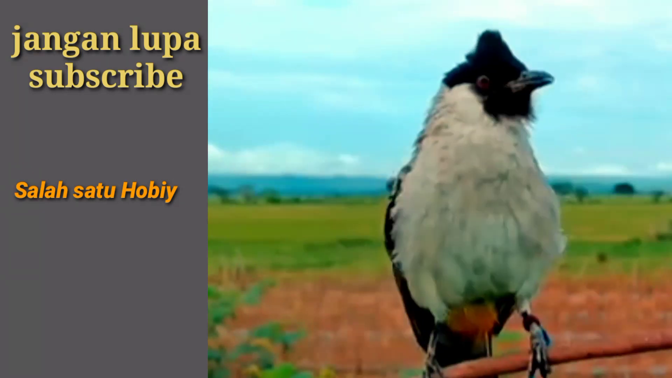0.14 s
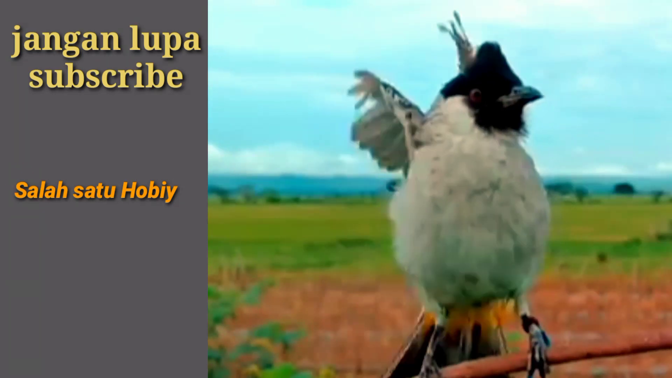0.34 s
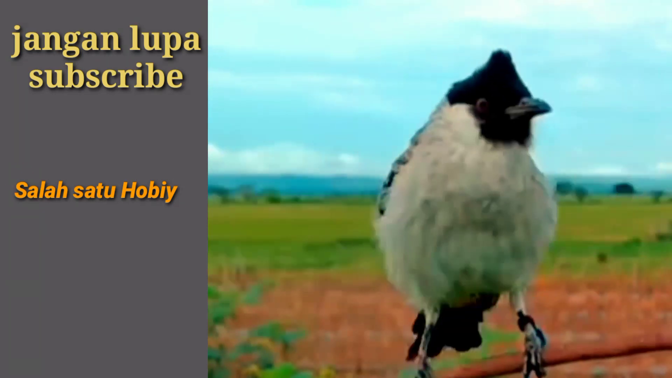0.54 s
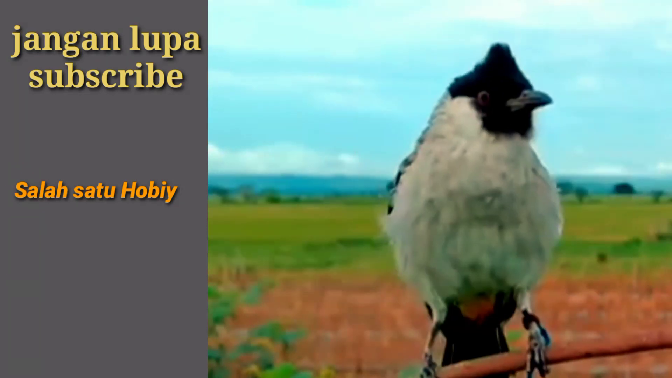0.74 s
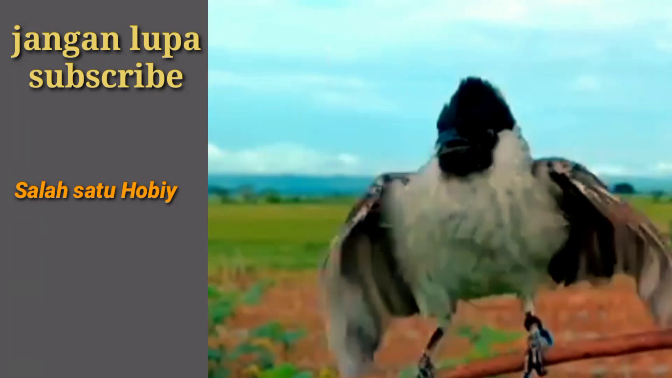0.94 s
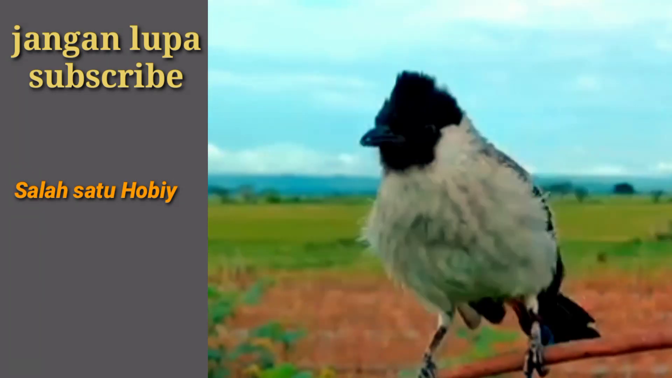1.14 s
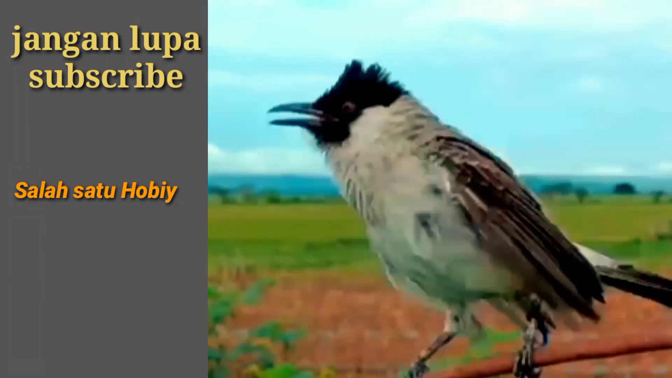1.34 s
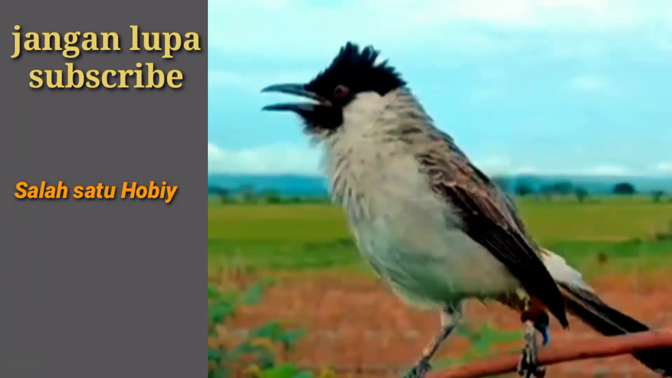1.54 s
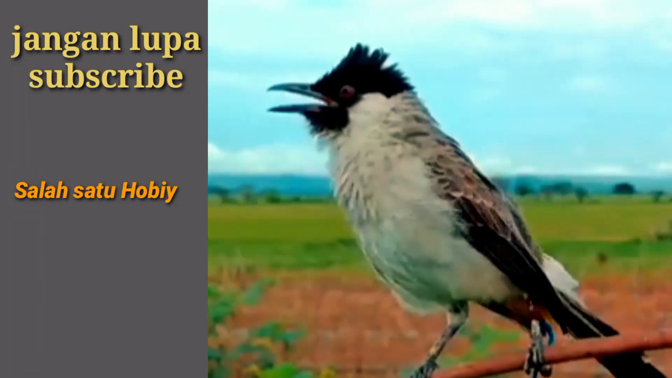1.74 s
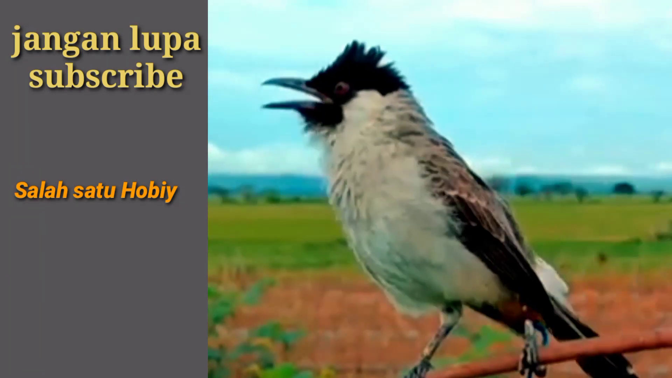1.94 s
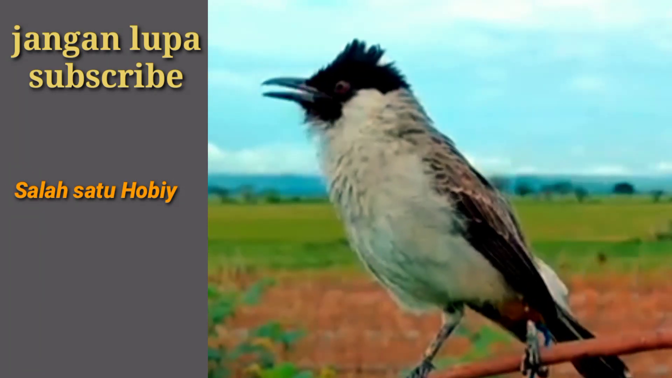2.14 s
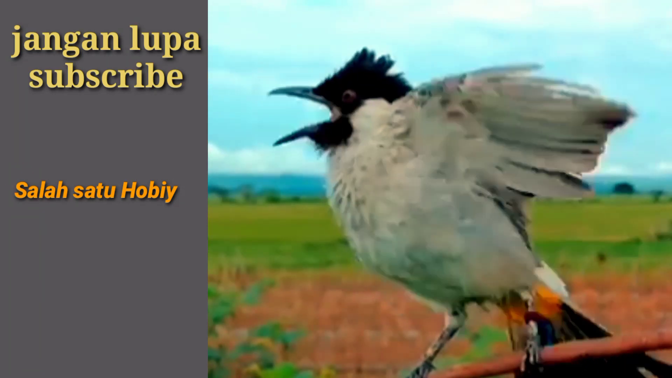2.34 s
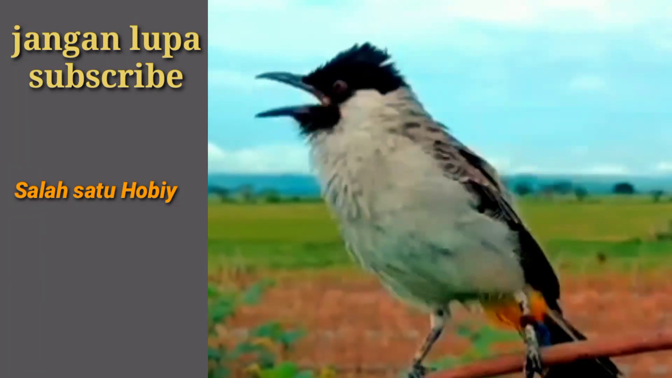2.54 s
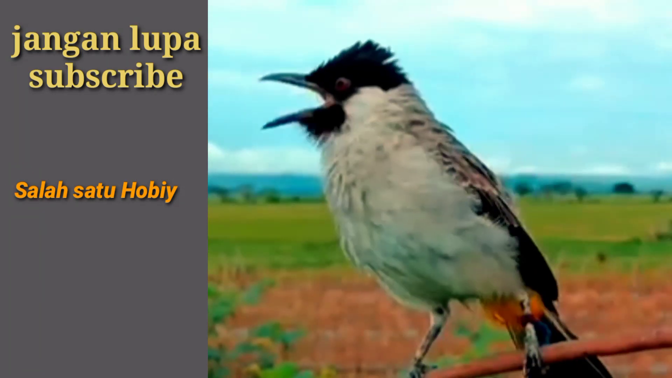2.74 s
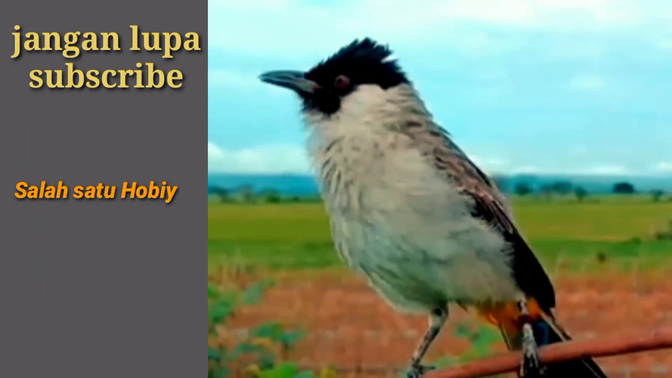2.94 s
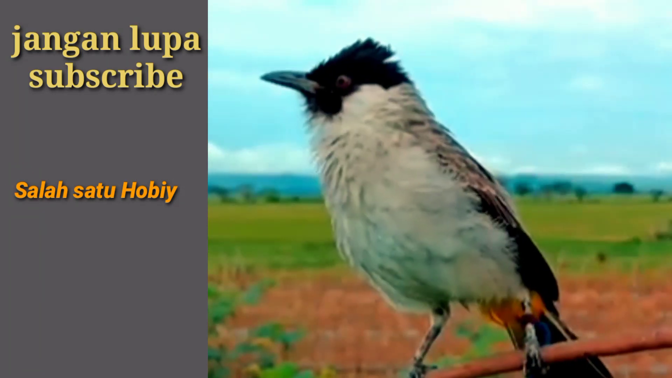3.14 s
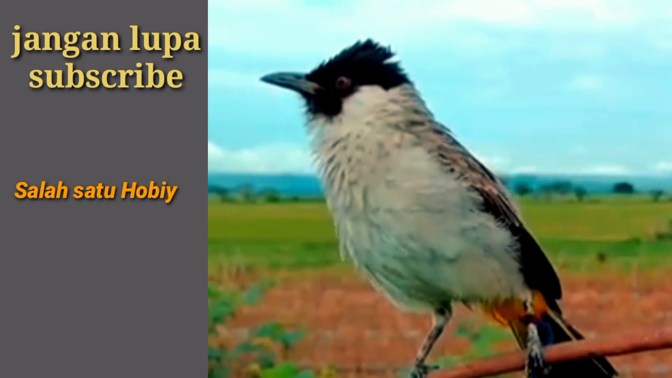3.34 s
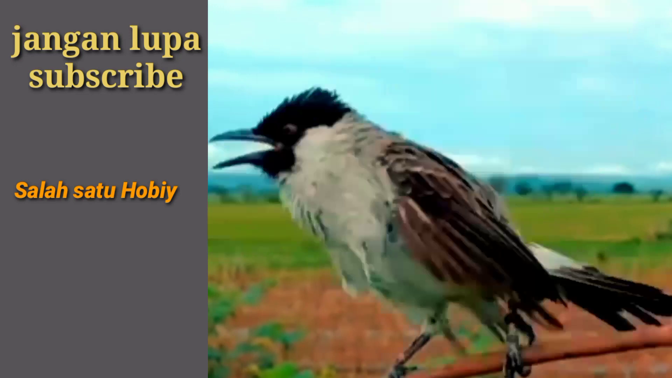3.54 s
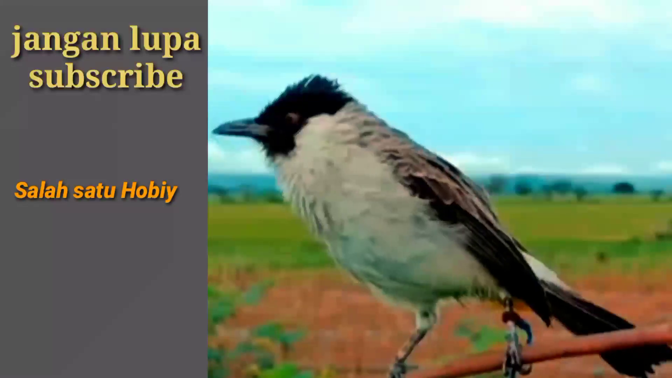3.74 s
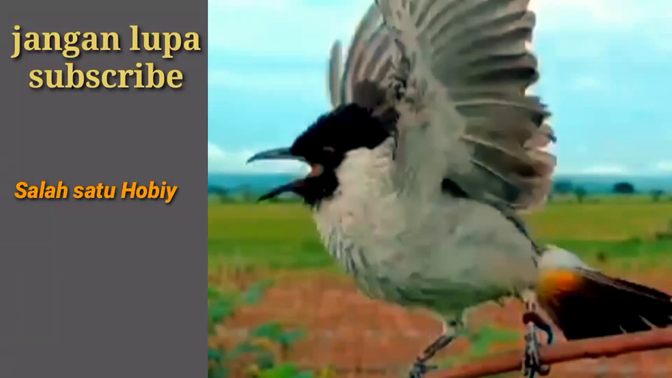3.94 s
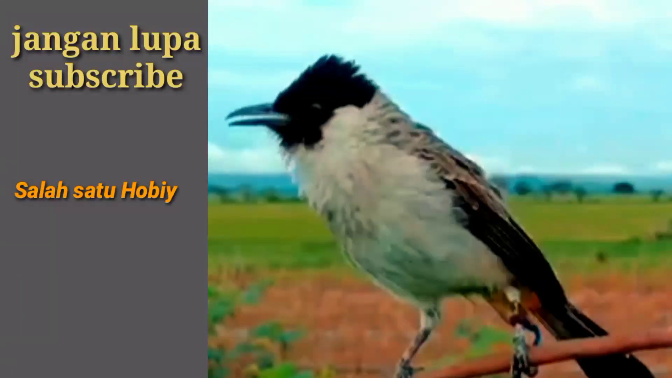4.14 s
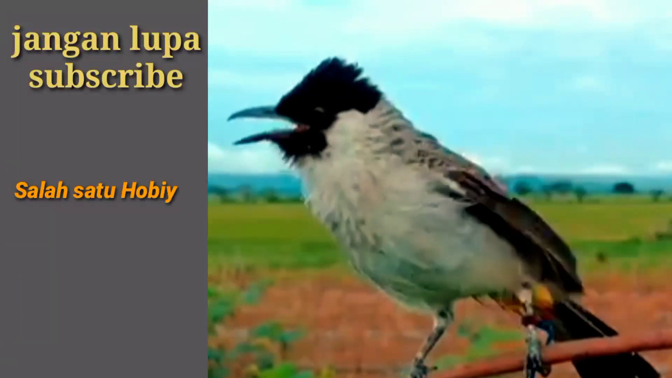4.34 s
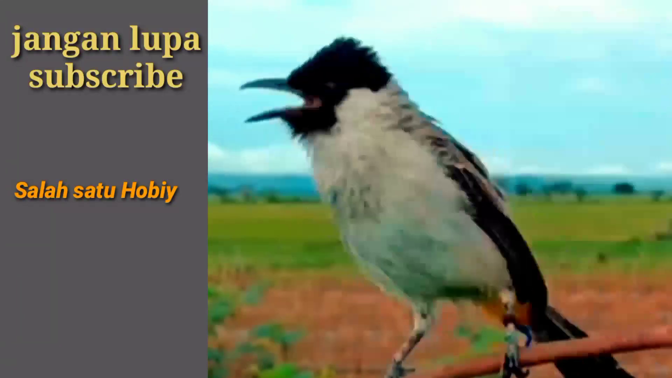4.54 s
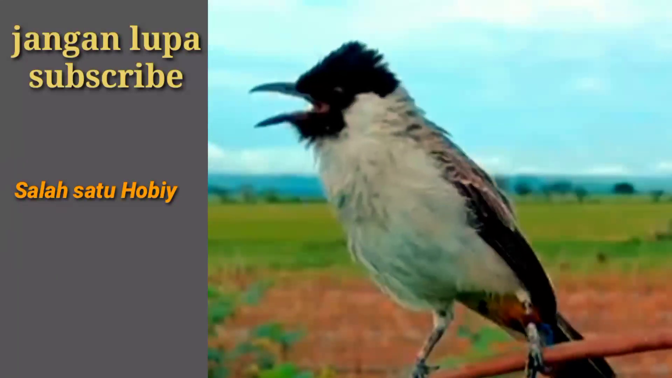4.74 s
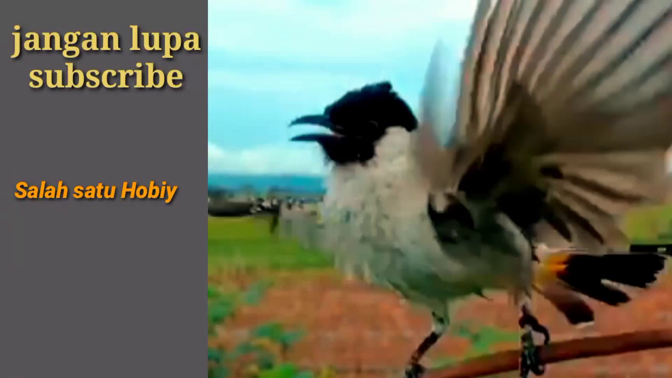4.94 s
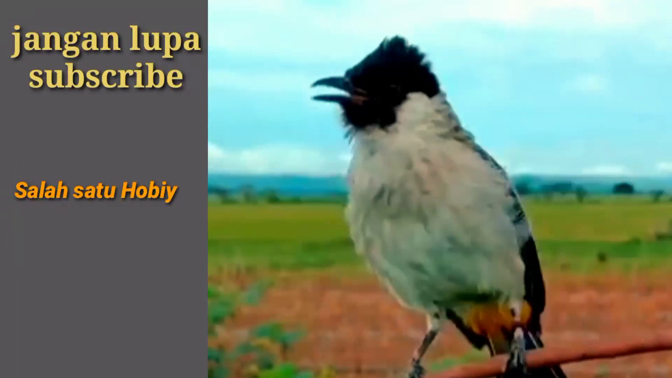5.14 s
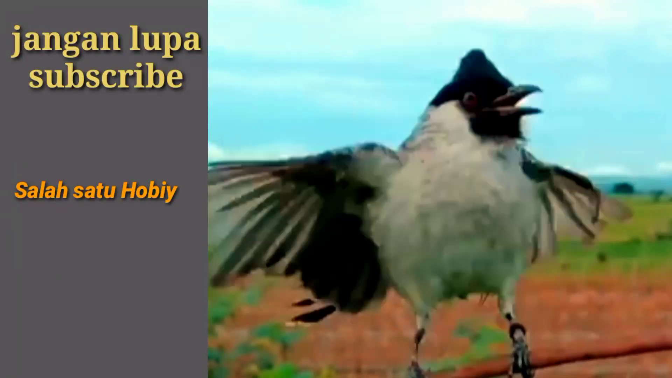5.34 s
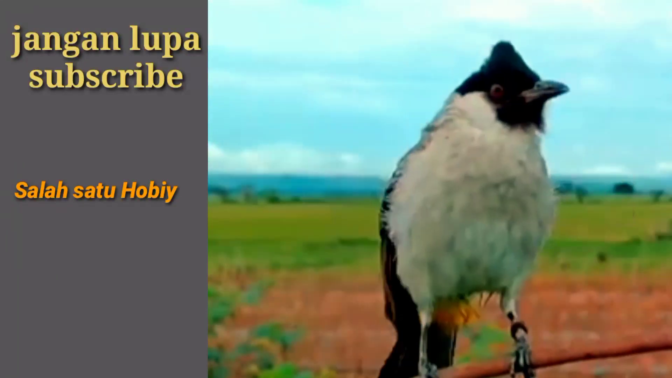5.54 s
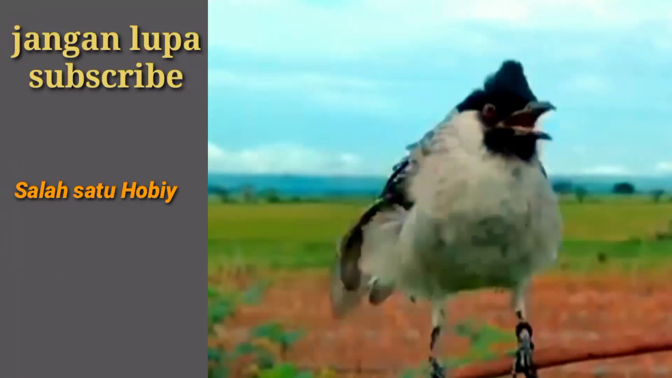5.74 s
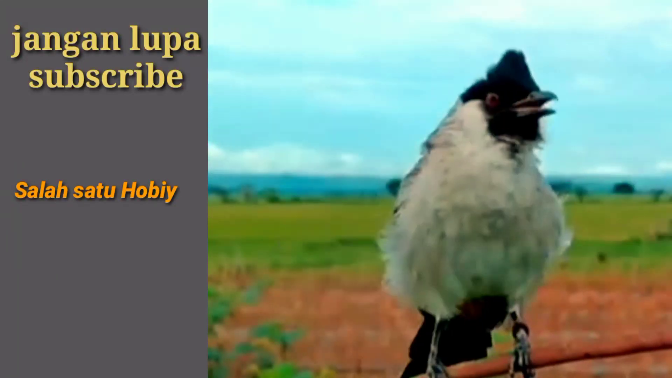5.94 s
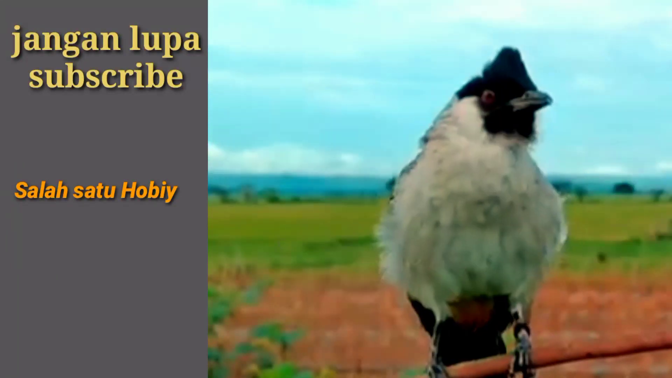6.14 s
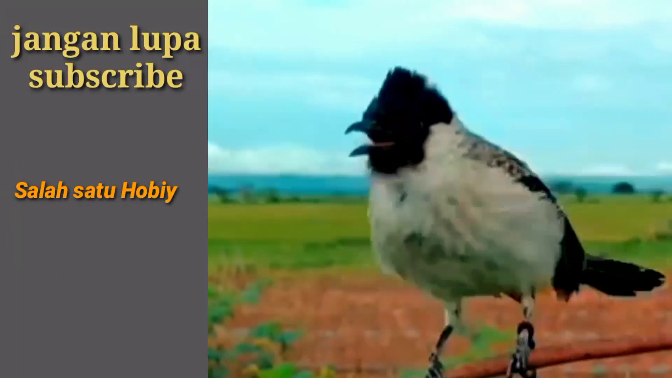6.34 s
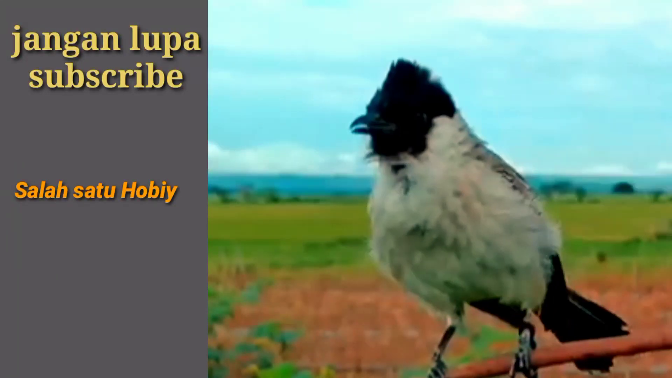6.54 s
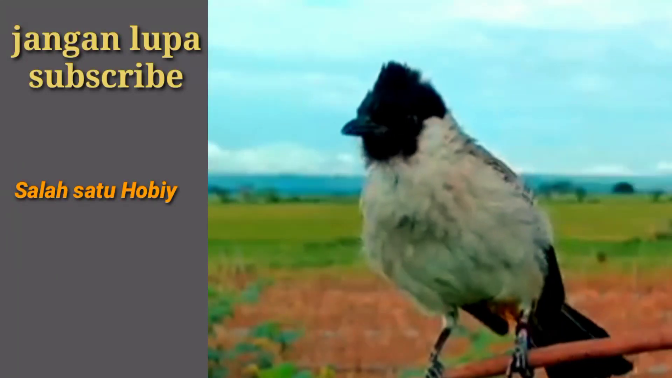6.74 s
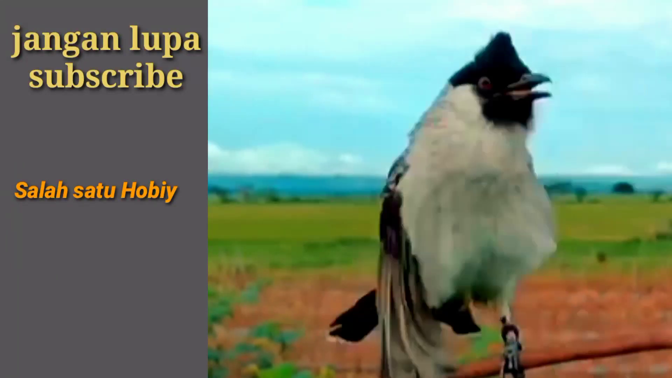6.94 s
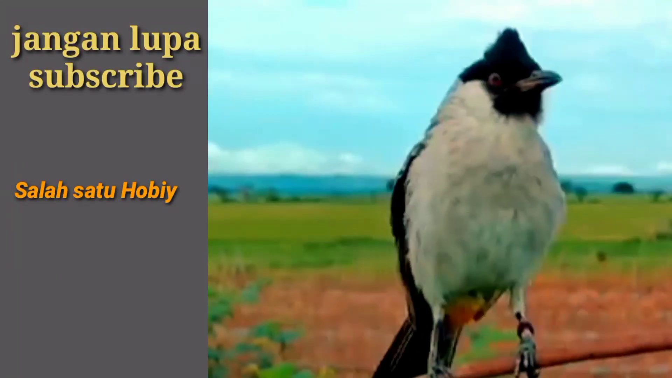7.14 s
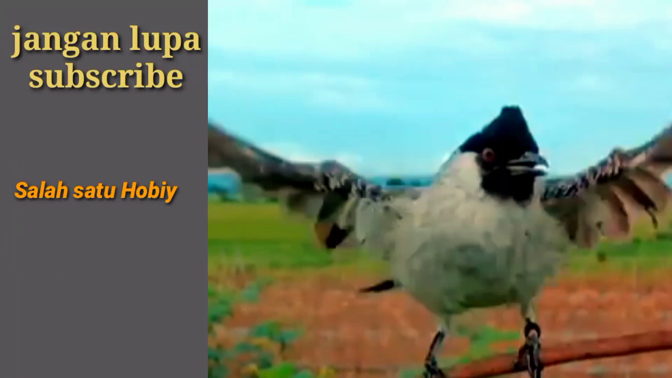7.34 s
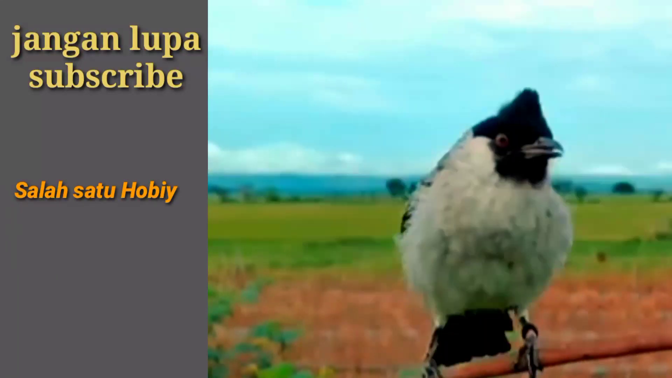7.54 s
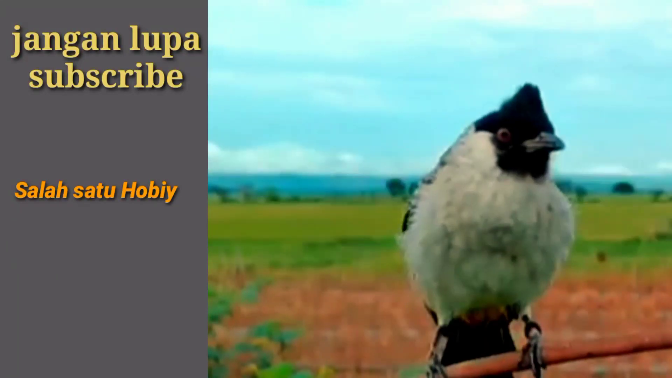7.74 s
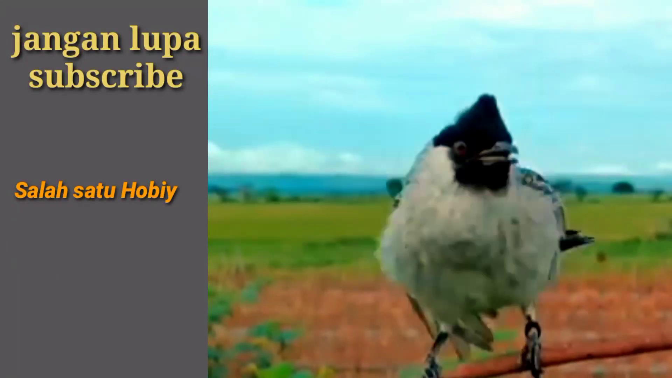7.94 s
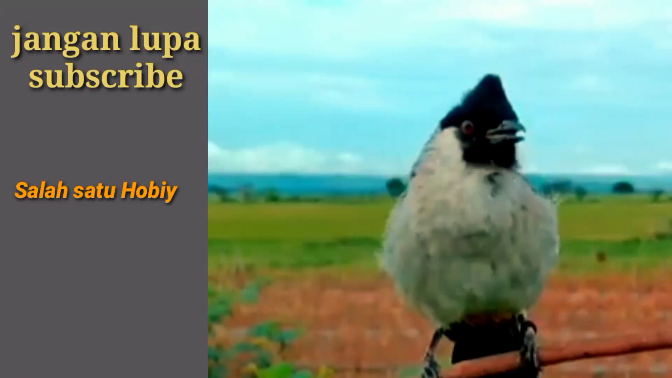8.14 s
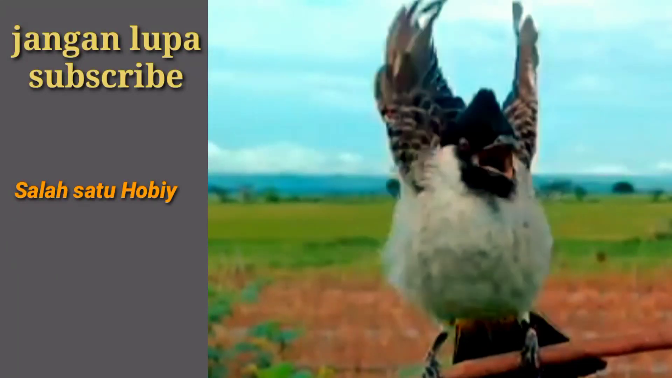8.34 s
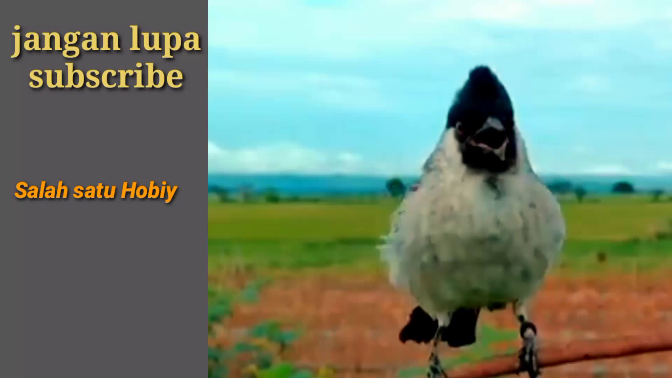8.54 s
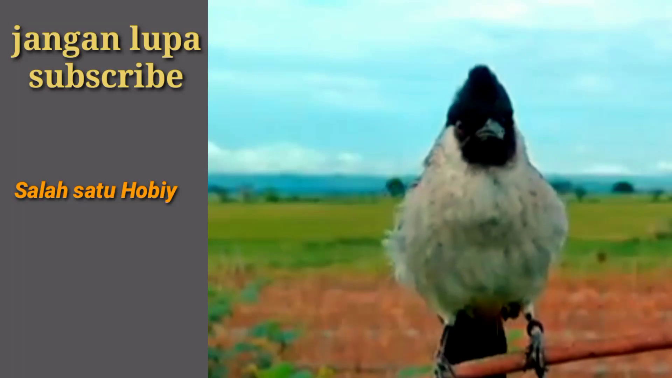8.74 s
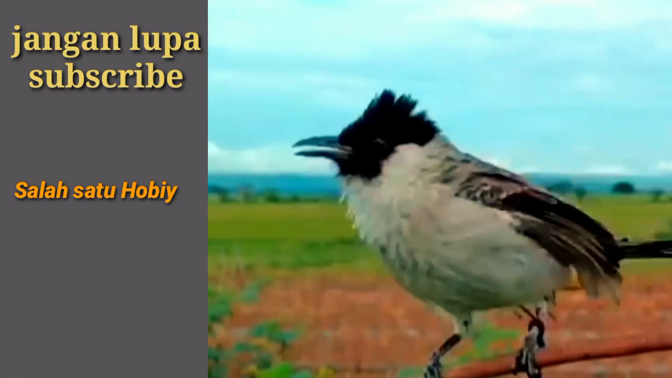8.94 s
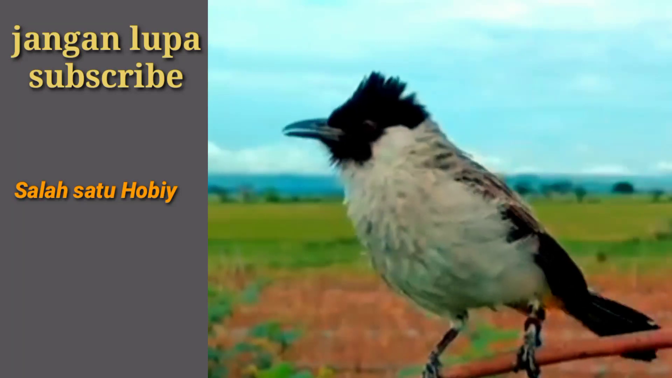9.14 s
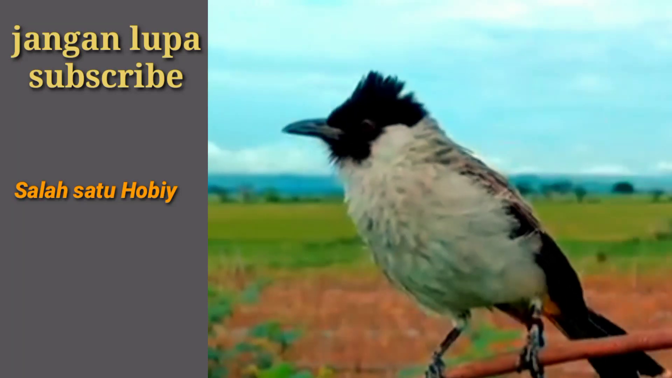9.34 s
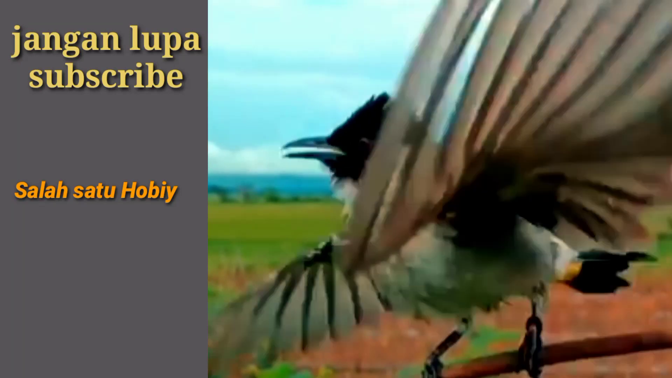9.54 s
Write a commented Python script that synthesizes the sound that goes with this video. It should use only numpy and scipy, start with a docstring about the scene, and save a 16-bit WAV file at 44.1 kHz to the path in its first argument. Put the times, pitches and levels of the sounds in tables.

```python
"""Bulbul singing close to the microphone

A bulbul strings gliding whistles (few partials), thin squeaks and raspy trilled chirps (harmonic stacks
through a throat response) into phrases; its loudest notes overload the input, its wings puff air at it.
Behind it: insect trills of gated tones, faint gliding far birds, shaped-noise hiss and a low air rumble."""
import sys
import numpy as np
from scipy import signal
from scipy.fft import rfft, irfft
from scipy.io import wavfile
from scipy.ndimage import uniform_filter1d, map_coordinates

SR = 44100
rng = np.random.default_rng(int(sys.argv[2]) if len(sys.argv) > 2 else 0)


def file_out(sig):
    """Save sig as 16-bit WAV at sys.argv[1]."""
    # one column per channel
    cols = np.atleast_2d(sig).T
    # limit, then scale
    lim = np.clip(cols, -1, 1)
    pcm = np.round(lim * 32767).astype(np.int16)
    wavfile.write(sys.argv[1], SR, pcm)


N = 423360
OVER = 4  # oversampling of the bird and the overload
FINE = OVER * SR  # samples/s

# Stock of notes, before stretch and pitch factor:
# (attack [s], release [s], relative level [dB], pitch curve of (time [s], pitch [Hz]))
RISE = (0.04, 0.0083, 3.8, [(0, 1600), (.0085, 2440), (.022, 2430), (.0334, 2799), (.0474, 2850),
        (.0574, 2900)])
PIP = (0.019, .012, 3.5, [(0, 1374), (.0045, 1770), (.008, 3133), (.01, 2861), (.0235, 2825), (.0355, 2968),
       (.0453, 2964), (.05, 2797), (.0564, 2948)])
DIP = (.007, 0.042, 2, [(0, 2082), (.0045, 2747), (.0085, 2660), (.014, 2517), (.0215, 1734), (.036, 1835),
       (.048, 2170)])
TOOT = (0.021, .013, 3.5, [(0, 2396), (.008, 2624), (.017, 2538), (.0395, 2767), (.045, 2695),
        (.0555, 2834)])
YIP = (0.00065, 0.02, 6, [(0, 3760), (.004, 2630), (.008, 3270), (.015, 3280)])
PEEP = (0.048, 0.014, -2, [(0, 1880), (.011, 1700), (.018, 2210), (.037, 2050)])
SPIKE = (.005, 0.018, 2.3, [(0, 1500), (.013, 1384), (.018, 1700), (.0235, 2600), (.026, 2000),
         (.029, 3000), (.035, 3020), (.043, 2406), (.072, 2296), (.082, 1900)])
WAVE = (0.0055, 0.012, 2.9, [(0, 1800), (.004, 1700), (.008, 2430), (.019, 2610), (.027, 1900), (.05, 1716),
        (.063, 1960), (.08, 2380), (.096, 2450)])
SQUEAK = (0.025, 0.013, -3.5, [(0, 1573), (.011, 1686), (.016, 1892), (.0195, 2650), (.03, 2080),
          (.046, 1880)])
LOOP = (.005, .014, 2.5, [(0, 2960), (.006, 4254), (.013, 4830), (.02, 4590), (.031, 2842), (.037, 2670),
        (.041, 3980), (.048, 3690), (.055, 3233), (.069, 3020)])
SLUR = (0.043, 0.028, 3.5, [(0, 2536), (.004, 3090), (.02, 2920), (.045, 3310), (.055, 3052), (.064, 2705),
        (.07, 2150), (.083, 1300)])
SLIDE = (0.0082, 0.016, 2.86, [(0, 1554), (.0056, 3140), (.0146, 3057), (.03, 2643), (.039, 2592),
         (.048, 2666), (.062, 2634), (.074, 2000)])
ROLL = (0.0086, 0.012, 2.9, [(0, 3290), (.006, 3193), (.009, 3696), (.02, 2768), (.043, 2300), (.057, 2360),
        (.07, 2817), (.089, 2510), (.098, 1310)])
HOOK = (.003, 0.014, 0.73, [(0, 1342), (.02, 1507), (.027, 2468), (.0375, 2758), (.0515, 2410),
        (.055, 1794), (.06, 2090), (.072, 1910)])
BUBBLE = (0.011, 0.013, 3.1, [(0, 1766), (.004, 1833), (.009, 1380), (.021, 1596), (.028, 2006),
          (.031, 2960), (.0345, 3400), (.039, 2204), (.045, 2008), (.058, 2258), (.066, 1650), (.072, 1620),
          (.091, 2180)])
FLICK = (.011, 0.012, 2.86, [(0, 2106), (.008, 2436), (.018, 2596), (.021, 2958), (.039, 2570),
         (.0455, 2313), (.047, 2026), (.063, 2310)])
# Set phrases of notes: (note, delay before stretch [s])
OPENING = [(YIP, 0), (PEEP, .074), (SPIKE, .12), (WAVE, .198)]
LONE_PIP = [(PIP, 0)]
WARBLE = [(SQUEAK, 0), (LOOP, .049), (SLUR, .161)]
ROLLING = [(SLIDE, 0), (ROLL, .0685), (HOOK, .165)]
BUBBLING = [(BUBBLE, 0), (FLICK, 0.09)]

LOW_INSECT_HZ, HIGH_INSECT_HZ = 4380, 4600


def amp(db):
    """Gain of a level in dB."""
    return 10 ** (np.asarray(db) / 20)


def evened(x):
    """Scale to rms 1."""
    return x / np.sqrt(np.mean(x ** 2) + 1e-20)


def read(points, hz):
    """Interpolate a curve over frequency on a log axis."""
    f, value = np.transpose(points)
    return np.interp(np.log(hz + 1), np.log(f), value)


def level(points):
    """Per-sample gain from a curve of dB over time."""
    s, db = np.transpose(points)
    return amp(np.interp(np.arange(N) / SR, s, db))


def add(mix, at, sound):
    """Mix a sound in at a sample index, cut at the end."""
    part = mix[max(round(at), 0):][:len(sound)]
    part += sound[:len(part)]


def noise(points, size):
    """Noise of rms 1 with the given spectrum."""
    spectrum = rfft(rng.standard_normal(size))
    gain = amp(read(points, np.fft.rfftfreq(size, 1 / SR)))
    return evened(irfft(spectrum * gain, size))


def wander(t, hz):
    """Smooth random curve of about unit size, through hz random points a second."""
    return map_coordinates(rng.standard_normal(2048), [(t - t[0]) * hz % 2047], order=3)


def edges(t, fade_s):
    """Soft start and stop."""
    return np.sin(np.pi / 2 * np.clip(np.minimum(t, t[-1] - t) / fade_s, 0, 1)) ** 2


def hiss():
    """High hiss: noise with several spectral peaks, dipping briefly in level."""
    # Spectrum: (frequency [Hz], relative gain [dB])
    hiss_spectrum = [(500, -24), (2000, -25), (3000, -31.5), (3650, -19), (4100, -19), (5000, -22.5),
                     (5650, -9), (6120, -1.5), (6550, -10), (7050, -16), (7550, -9), (8300, -22.5),
                     (9650, -15), (11300, -24.5), (15000, -46.5)]
    # Overall strength: (time [s], level [dB])
    hiss_course = [(0, -50), (3.79, -49), (3.83, -61.5), (4.2, -51), (9.6, -49)]
    return noise(hiss_spectrum, N) * level(hiss_course)


def breeze(lumps_db=4):
    """Low rumble of moving air, lumpy in level."""
    # Spectrum: (frequency [Hz], relative gain [dB])
    rumble_spectrum = [(15, 0), (45, 6.5), (90, 2.5), (150, -7), (210, -15.5), (270, -20.5), (340, -34),
                       (600, -56), (2000, -63.5), (5000, -86.5)]
    # Slow strength: (time [s], relative level [dB])
    breeze_course = [(0, -38.5), (.26, -50), (.35, -37.5), (.92, -29.5), (1.34, -37), (1.8, -47.5),
                     (3.6, -52.5), (4.5, -39.5), (5.9, -46.5), (7.4, -49.5), (8.6, -52), (9.1, -42.5),
                     (9.6, -60)]
    lumps = amp(3.0 + lumps_db * wander(np.arange(N) / SR, 22))
    return noise(rumble_spectrum, N) * level(breeze_course) * lumps


def far_birds():
    """Short wavering glides from farther off."""
    # Calls: (start [s], length [s], start pitch [Hz], end pitch [Hz], relative level [dB])
    far_calls = [(1.251, 0.06, 3410, 2560, -32.5), (1.358, 0.09, 2700, 2520, -35.5),
                 (4.029, .07, 3900, 4255, -55), (7.431, .057, 3340, 3760, -49),
                 (7.718, 0.074, 3370, 2624, -35.5), (7.855, 0.086, 2690, 2376, -38),
                 (7.997, 0.044, 3340, 3620, -38.5), (8.18, 0.057, 2410, 3200, -32.5),
                 (8.491, .035, 3450, 3720, -35), (8.86, 0.049, 3510, 3590, -30.5),
                 (8.956, 0.045, 3150, 2635, -34.5), (9.503, .08, 3510, 3786, -49)]
    out = np.zeros(N)
    for s, length_s, from_hz, to_hz, db in far_calls:
        t = np.arange(0, length_s, 1 / SR)
        hz = np.linspace(from_hz, to_hz, len(t)) * (1 + 0.035 * wander(t, 250))
        strength = amp(db + 1.5 + 2.7 * wander(t, 120)) * edges(t, 0.0052)
        add(out, s * SR, strength * np.sin(2 * np.pi * np.cumsum(hz) / SR))
    return out


def insects(chirps_hz=20, sag=.04):
    """Each cricket-like chirp is two wing strokes and a rest; each stroke sags in pitch."""
    # Trills: (start [s], end [s], mid-stroke pitch [Hz], mean level [dB])
    insect_trills = [(0.115, .456, LOW_INSECT_HZ, -45), (0.991, 2.292, LOW_INSECT_HZ, -43.5),
                     (2.597, 3.0, HIGH_INSECT_HZ, -45.5), (3.19, 3.754, LOW_INSECT_HZ, -42),
                     (5.419, 6.203, LOW_INSECT_HZ, -51), (6.765, 7.457, LOW_INSECT_HZ, -43.5),
                     (6.898, 7.449, HIGH_INSECT_HZ, -56), (7.802, 8.046, HIGH_INSECT_HZ, -53),
                     (8.737, 9.52, LOW_INSECT_HZ, -44.5)]
    out = np.zeros(N)
    for start, end, hz, db in insect_trills:
        t = np.arange(0, end - start, 1 / SR)
        stroke = (t * chirps_hz % 1) * 3
        gate = np.sin(np.pi * (stroke % 1)) * (stroke < 2)
        drift = 1 - sag * (stroke % 1 - .5) + 0.0016 * wander(t, 190)
        turns = np.cumsum(hz * drift) / SR
        add(out, start * SR, amp(db + wander(t, 26)) * gate * np.sin(2 * np.pi * turns))
    return out


def wing_puffs():
    """Wings throw puffs of air at the microphone: low noise under Gaussian swells."""
    # Puffs: (time of peak [s], Gaussian width [s], level [dB])
    puff_times = [(1.577, 0.016, -16.5), (2.696, 0.027, -29), (3.261, 0.064, -33.5), (3.803, 0.016, -4.5),
                  (3.838, 0.068, -29.5), (4.273, 0.029, -16.5), (4.71, 0.025, -24), (5.239, 0.037, -26.5),
                  (6.51, .025, -24.5)]
    # Spectrum: (frequency [Hz], relative gain [dB])
    puff_spectrum = [(15, -11.5), (45, 9), (85, 2.5), (130, -10.5), (220, -24), (500, -34), (2000, -51.5),
                     (6000, -74)]
    out = np.zeros(N)
    t = np.arange(-SR // 3, SR // 3) / SR
    for s, width_s, db in puff_times:
        swell = np.exp(-(t / width_s) ** 2 / 2)
        puff = noise(puff_spectrum, len(t)) * swell
        # same energy as the swell
        puff = puff * np.linalg.norm(swell) / np.linalg.norm(puff)
        add(out, (s + t[0]) * SR, amp(db) * puff)
    return out


def wingbeat(s=3.803, hz=85, width_s=0.016, db=2):
    """One full downstroke shoves air at the microphone: a few slow pressure swings."""
    t = np.arange(-SR // 8, SR // 8) / SR
    out = np.zeros(N)
    swings = np.sin(2 * np.pi * hz * t + 0.69 * wander(t, 141.2))
    swings += amp(-14.0) * wander(t, 732)
    add(out, (s + t[0]) * SR, amp(db) * np.exp(-(t / width_s) ** 2 / 2) * swings)
    return out


def contour(note, stretch, pitch, db, shimmer_db=0.84):
    """Pitch and strength of a note that swells, holds and dies, with random wavering in both."""
    attack_db, release_db = -24, -36
    attack_s, release_s, note_db, curve = note
    s, hz = np.transpose(curve)
    t = np.arange(0, s.max() * stretch, 1 / FINE)
    hz = uniform_filter1d(np.interp(t, np.sort(s) * stretch, hz), size=400)
    hz = hz * pitch * (1 + .005 * wander(t, 140))
    swell_db = attack_db * np.maximum(1 - t / attack_s, 0) ** 2
    swell_db += release_db * np.maximum(1 - (t[-1] - t) / release_s, 0) ** 2
    strength = amp(db + note_db + swell_db + shimmer_db * wander(t, 400)) * edges(t, .0015)
    return t, hz, strength


def whistle(note, stretch, pitch, db, overtone_db=-24, fall_db=-13, half_db=-42, air_db=-47,
            husk_db=-32, glide_db=-29, slack_db=-11):
    """Nearly pure tone, loudest at the throat resonance; overtones come through when it dives below."""
    # Strength where the pitch meets the throat resonance: (pitch [Hz], gain [dB])
    carry = [(950, -19), (1300, -27.5), (1480, -15), (1750, -8), (2100, -4), (2500, -1), (3700, -1),
             (4400, -3.5), (4800, -11)]
    # Throat response to the overtones: (frequency [Hz], relative gain [dB])
    whistle_throat = [(800, -19), (1300, 10.5), (1800, 11.5), (2700, 5.5), (3500, -6), (4200, -16.5),
                      (4900, -26), (5600, -32), (9000, -27)]
    # Slackness of low notes: (pitch [Hz], share [0-1])
    slackness = [(1450, 1), (1800, 0)]
    t, hz, strength = contour(note, stretch, pitch, db)
    strength = strength * amp(read(carry, hz))
    phase = 2 * np.pi * np.cumsum(hz) / FINE
    tone = np.sin(phase)
    for k in range(2, 5):
        throat_db = read(whistle_throat, k * hz) - read(whistle_throat, np.minimum(hz, 3200))
        waver_db = 3 * wander(t, 200)
        purity_db = 4 * np.clip(strength, 0, 1.5)  # full-throated notes are the purest
        overtone_gain = amp(overtone_db + fall_db * (k - 4) + throat_db + waver_db - purity_db)
        tone += overtone_gain * np.sin(k * phase)
    # faint, wavering lines at half and one and a half times the pitch
    waver = amp(6 * np.tanh(wander(t, 110)))
    tone += amp(half_db) * waver * (np.sin(phase / 2) + np.sin(phase + phase / 2))
    # low notes go slack and buzz between the harmonics
    tone += amp(slack_db) * read(slackness, hz) * np.sin(1.5 * phase)
    # fast glides shake the tone
    glide = np.tanh(abs(np.gradient(np.log(hz))) * FINE / 40)
    tone += (amp(air_db) + amp(glide_db) * glide) * wander(t, 4100) * np.cos(phase)
    # barely voiced stretches turn husky
    weak = np.exp(-strength / 1.5) * edges(t, .003)
    rough_tone = wander(t, 1600) * np.sin(2 * np.pi * 2700 * t + 2 * wander(t, 750))
    return strength * tone + amp(husk_db) * weak * rough_tone


def squeak(note, stretch, pitch, db, grit_db=-23):
    """Thin note, heard mostly an octave above its pitch, with grit growing along it."""
    t, hz, strength = contour(note, stretch, pitch, db)
    phase = 2 * np.pi * np.cumsum(hz) / FINE
    tone = np.sin(2 * phase) + amp(-12.0) * np.sin(phase)
    tone += amp(-28) * np.sin(3 * phase) + amp(-17) * np.sin(phase + phase / 2)
    grit = wander(t, 4100) * np.sin(2 * np.pi * 3300 * t)
    grit *= amp(grit_db) * t / t[-1] * edges(t, .002)
    return strength * tone * (1 + 0.069 * wander(t, 1800)) + grit


def open_beak(t, hz, harsh, other_db=-11, harsh_db=11, rasp=0.13, half_db=-20):
    """Harmonic stack through throat and open beak; harshness brings up harmonics above the second."""
    # Throat and beak response: (frequency [Hz], gain [dB])
    beak_throat = [(600, -38.5), (1100, -11), (1600, -14.5), (2100, -15), (2700, -5.5), (3300, 0.5),
                   (3900, 2.5), (4400, -5), (5200, -13), (6200, -24), (9000, -23.5), (15000, -76.5)]
    phase, tone = 2 * np.pi * np.cumsum(hz) / FINE, 0
    for k in range(1, 8):
        source_db = 0 if k <= 2 else other_db + harsh_db * harsh + 2 * wander(t, 250)
        tone = tone + amp(source_db + read(beak_throat, k * hz)) * np.sin(k * phase)
    for k in np.arange(3) + .5:  # wavering lines at 0.5, 1.5 and 2.5 times the pitch
        line_db = half_db + 0.6 * wander(t, 100)
        tone = tone + amp(line_db + read(beak_throat, k * hz)) * np.sin(k * phase)
    return tone * (1 + rasp * (.5 + harsh) * wander(t, 2500))


def chirp(length_s, top_hz, trill_hz, db, harsh, low_hz=950, slowing=0.1, throb_db=3):
    """Pitch climbs an arch while a fast, slowing trill sweeps it across the throat resonance."""
    # Course: (share of length [0-1], share of climb to the top pitch, relative level [dB])
    arch = [(0, 0, -31), (.1, .22, -16), (.2, .56, -6), (.32, .86, -2.5), (.5, 1.04, -2), (.68, 1.01, -1.5),
            (.85, .87, -4), (.94, .6, -8), (1, .33, -29)]
    # Higher chirps trill less deeply: (top pitch [Hz], nominal depth [share of pitch])
    trill_depth = [(1600, .22), (1780, .125), (2000, .065)]
    first_crest_s = .017  # from the start to a crest of the trill
    t = np.arange(0, length_s, 1 / FINE)
    share, climb, arch_db = np.transpose(arch)
    climb, arch_db = (np.interp(t / t[-1], share, c) for c in (climb, arch_db))
    u = t - first_crest_s
    trill = np.cos(2 * np.pi * trill_hz * u * (1 + slowing * (1 - u / .053)))
    narrowing = 1.25 - .5 * t / t[-1]
    swing = read(trill_depth, top_hz) * np.clip(.5 + climb, 0, 1) * narrowing
    jitter = (.009 + .026 * harsh) * wander(t, 1500)
    hz = (low_hz + (top_hz - low_hz) * climb) * (1 + swing * trill + jitter)
    throb = throb_db * harsh * (trill - .5)  # harsh chirps pulse with the trill
    return amp(db + arch_db + throb) * open_beak(t, hz, harsh) * edges(t, 0.00071)


def bulbul():
    """Set phrases, chatter (lead note, dip, toot) and raspy chirps, each in its place."""
    # Phrases: (start [s], phrase, time stretch [factor], pitch [factor], relative level [dB])
    phrase_times = [(0, OPENING, 1, 1, 0), (2.484, LONE_PIP, 1.076, 1.073, 0), (2.573, WARBLE, 1, 1, 0),
                    (2.935, WARBLE, .985, .99, -.5), (5.9844, ROLLING, 1, 1.002, .3),
                    (6.568, ROLLING, 1, 1, 0), (8.23, BUBBLING, .985, .995, -.3),
                    (8.659, BUBBLING, 1, 1.005, 0), (9.156, BUBBLING, 1.01, 1.005, -.5)]
    # Chatter: (start [s], lead note, its time stretch [factor], its pitch [factor], delay of dip [s],
    # relative level of dip [dB], pitch of dip and toot [factor])
    chatter = [(1.599, RISE, 1.017, 0.98, .0725, -2.5, 0.97), (1.8102, PIP, 1.006, 1.042, 0.071, -0.5, .99),
               (2.0304, PIP, 1.11, 1.052, .069, 0, 0.98), (2.2538, PIP, 1, 1.046, 0.07, -.5, 0.99),
               (4.298, PIP, 0.88, 1.023, .067, -3.5, .985), (4.5124, PIP, 1.03, 1.043, 0.069, -0.6, 1),
               (4.7336, PIP, 1.01, 1.046, 0.07, -0.65, 0.99), (4.962, PIP, 1.055, 1.022, .0725, 0.3, 0.98),
               (5.195, PIP, 1.053, 1.04, 0.073, 1, 0.99), (5.445, PIP, 1.05, 1.02, 0.072, 2, 0.99)]
    # Chirps: (start [s], length [s], nominal top pitch [Hz], nominal trill rate [Hz],
    # relative level [dB], harshness [0-1])
    raspy_chirps = [(0.5978, 0.071, 1655, 113, 0, 0.58), (1.057, 0.076, 1571, 128, -.5, 0.43),
                    (1.1692, 0.084, 1663, 105, -1.5, 1), (1.4408, 0.092, 1900, 86, 2.5, .64),
                    (3.7243, 0.071, 1833, 124, -1, 0.42), (4.141, 0.09, 1954, 125, -1.5, 0.42),
                    (5.839, 0.093, 1944, 107, 2, 0.28), (6.4339, 0.092, 1892, 102, 3, 0.32),
                    (7.113, 0.083, 1745, 112, 1.5, .34), (7.4919, .084, 1732, 112, .5, 0.84),
                    (7.635, .085, 1415, 120, -1.5, 1), (8.0451, .092, 1806, 109, 1.5, 0.95),
                    (8.526, 0.096, 2035, 109, 3.5, 0.71), (9.0248, 0.093, 2020, 108, 2.5, 0.46)]
    toot_after_dip_s = 0.046
    song = np.zeros(N * OVER)
    for s, phrase, stretch, pitch, db in phrase_times:
        for note, delay_s in phrase:
            voice = squeak if note == SQUEAK else whistle
            add(song, (s + delay_s * stretch) * FINE, voice(note, stretch, pitch, db))
    for s, lead, stretch, lead_pitch, delay_s, dip_db, pitch in chatter:
        add(song, s * FINE, whistle(lead, stretch, lead_pitch, 0))
        add(song, (s + delay_s) * FINE, whistle(DIP, 1, pitch, dip_db))
        add(song, (s + delay_s + toot_after_dip_s) * FINE, whistle(TOOT, 1, pitch, 0))
    for s, *manner in raspy_chirps:
        add(song, s * FINE, chirp(*manner))
    return signal.resample_poly(song, 1, OVER)


def echoes(x, t60_s):
    """Sparse, decaying reflections from the ground and things around."""
    # Colour of the surroundings: (frequency [Hz], gain [dB])
    surround = [(500, -11.5), (1800, 8.5), (2400, -11), (2750, 8), (3200, 4), (3700, -3), (4500, -14.5),
                (9000, -20)]
    t = np.arange(SR // 2) / SR
    sparse = rng.standard_normal(len(t)) * (rng.random(len(t)) < 2000 / SR)
    taps = sparse * (t > .004) * amp(-60 * t / t60_s)
    colour = amp(read(surround, np.fft.rfftfreq(N, 1 / SR)))
    return signal.fftconvolve(irfft(rfft(x) * colour, N), taps / np.linalg.norm(taps))[:N]


def scene():
    """Sum of the background, the wings and the bird; both bird layers have echoes."""
    far, bird = far_birds(), bulbul()
    distant = far + amp(-6) * echoes(far, t60_s=.25)
    near = bird + amp(-35) * echoes(bird, t60_s=.25)
    return (hiss() + breeze() + distant + insects() + wing_puffs() + wingbeat() + near)[None]


def record(dry, ceiling=0.86, edge_hz=15300):
    """Input overload clips loud notes, adding a bright third harmonic; then a low-pass band limit."""
    clipped = np.clip(signal.resample_poly(dry, OVER, 1, axis=1), -ceiling, ceiling)
    out = signal.resample_poly(clipped, 1, OVER, axis=1)
    low_pass = signal.firwin(301, edge_hz, window=("kaiser", 8), fs=SR)
    return signal.oaconvolve(out, low_pass[None], "same")


dry = scene()
out = record(dry)
file_out(out)
```